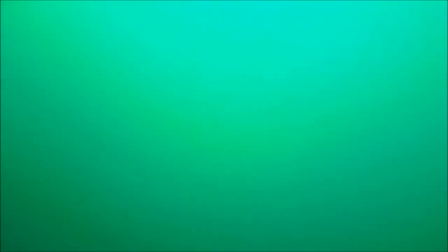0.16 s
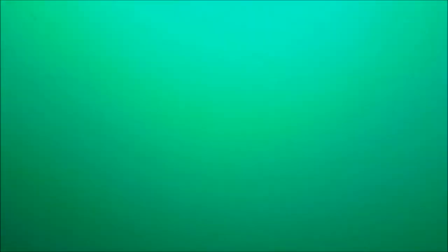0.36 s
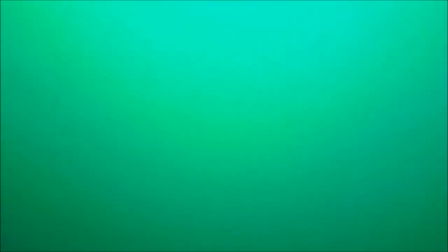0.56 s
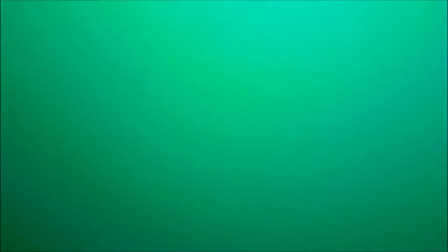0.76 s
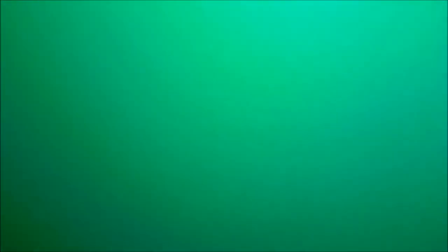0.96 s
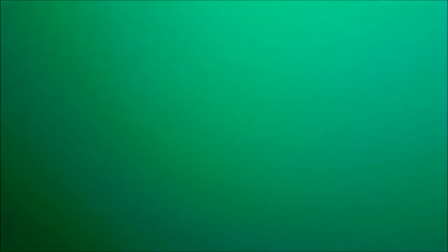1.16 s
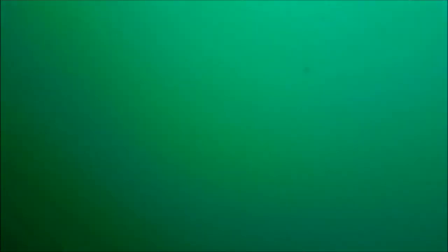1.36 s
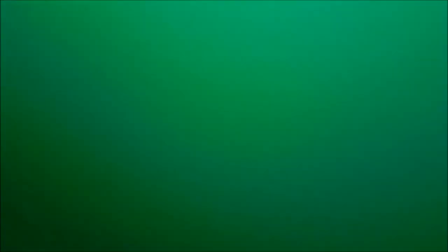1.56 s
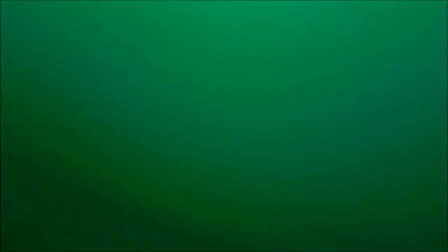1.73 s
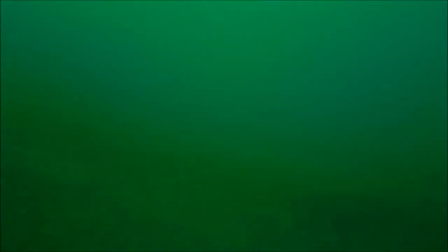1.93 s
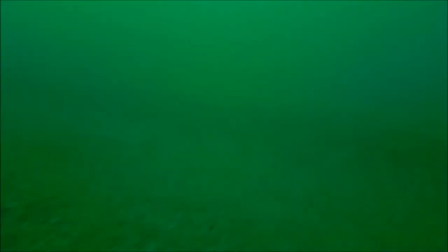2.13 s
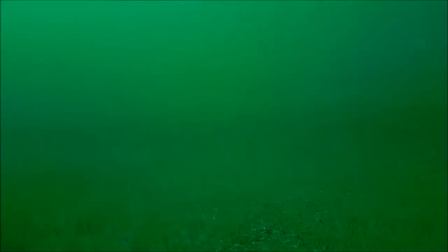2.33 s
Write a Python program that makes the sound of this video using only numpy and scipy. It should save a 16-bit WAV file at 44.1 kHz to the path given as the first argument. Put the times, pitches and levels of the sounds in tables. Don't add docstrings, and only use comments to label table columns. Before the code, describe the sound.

A distant boat engine throbs unevenly underwater over a soft hush of water, then fades; close scrapes, ticks and short squeaks follow on the plastic housing around the microphone, ending with a hard, distorted knock.

```python
import sys
import numpy as np
from scipy import signal
from scipy.fft import rfft, irfft
from scipy.io import wavfile

SR = 44100
rng = np.random.default_rng(int(sys.argv[2]) if len(sys.argv) > 2 else 0)


def wav_out(sig):
    wavfile.write(sys.argv[1], SR, np.round(np.clip(np.atleast_2d(sig).T, -1, 1) * 32767).astype(np.int16))


def ratio(d):
    e = np.asarray(d, float) / 20
    return 10 ** e


N = 105531
T = np.arange(N) / SR

# frequency [Hz], width [Hz], level for the engine [dB], level for contacts [dB].
SHELL_MODES = [(414.5, 29, -23.5, -6), (524.3, 28.5, -5, -6), (794.6, 113.4, 1, -2), (936, 136.3, 1, 1),
               (1096.4, 167, -9, -3.5), (1488.5, 27, -6.5, 3), (1629, 101, -7, 1), (1863, 270, -29.5, -0.5),
               (1969, 468, -45, -6), (2632, 85, -8.5, 2.5), (3024, 660, -38.5, -16), (3860, 234, -19, -9.5),
               (4945, 310, -51.5, -23), (5576, 143, -48, -22.5)]
WINDOW_MODES = [(3617.6, 435, -24, -11.5), (5740, 83, -86, -29.5), (6500, 60, -47.5, -32),
                (7570, 330, -52, -41), (8400, 690, -50.5, -27)]
# time [s], firing rate [Hz], level of the firing note [dB].
ENGINE_SPEED = [(0, 184.9, -61), (0.044, 186, -52), (.09, 169.9, -60.5), (0.299, 166.4, -60),
                (0.539, 169.2, -59), (.7, 185.5, -57.5), (0.841, 197.6, -58), (1.041, 196.7, -55),
                (1.14, 189.6, -57.5), (1.167, 193.9, -74), (1.198, 197.1, -54), (1.3, 187.8, -71.5)]
# time [s], level [dB].
ENGINE_LOAD = [(0, -39), (.1, -39), (.38, -38), (.44, -35.5), (.62, -35), (.8, -33.5), (1.0, -33),
               (1.22, -34), (1.25, -45.5), (1.3, -56)]
# multiple of the firing rate, level [dB].
SHAKING_ORDERS = [(2, -15), (2.5, -18), (3, -27), (4, -24), (5, -32)]
# time [s], peak level [dB], depth of the lull before [dB].
STRONG_FIRINGS = [(0.029, -25, -4), (0.113, -39, 10), (0.144, -30.5, 2), (0.212, -34, 5), (0.245, -25, 15),
                  (0.312, -27, 1), (0.395, -24, -3), (0.419, -21, -1), (0.426, -20, -5), (0.492, -21, 2),
                  (0.541, -24.5, 1.5), (0.56, -23.5, 3), (0.584, -25.5, 0), (0.605, -25, -4.5),
                  (.617, -26, -6), (0.656, -25, 4.5), (0.689, -29.5, 9), (0.694, -26.5, -7),
                  (0.722, -26.5, 1), (0.736, -17, 0), (.755, -21, 2.5), (0.799, -22, 18.5),
                  (0.815, -25, 1.5), (0.84, -20.5, 6), (0.853, -19.5, -2), (0.8894, -20.5, 17),
                  (0.909, -22, 3), (.921, -21.5, 3.5), (.966, -27.5, -1.5), (1.025, -29, 1),
                  (1.098, -30.5, 3.5), (1.132, -24, 1), (1.19, -20, -5)]
# frequency [Hz], density [dB per Hz].
WATER_SPECTRUM = [(12, -52), (20, -0.5), (218, -9), (776, -13.5), (924, 1.5), (1380, -11), (3630, -12),
                  (7660, -24.5), (9960, -32), (16900, -120)]
# time [s], change of the hush [dB].
FLOW_LEVEL = [(0, 0.3), (.6, 1.2), (1.2, 0.4), (1.5, -2), (1.62, -1), (1.9, -1.5), (2.05, -3), (2.4, 2)]
# centre [s], frequency [Hz], level
# [dB], half length [s].
SLOSHES_AND_THUMPS = [(1.27, 27.98, -54, 0.043), (1.275, 500, -49.5, 0.026), (2, 526, -44, 0.013),
                      (1.432, 189, -42, 0.0021), (1.44, 30.3, -51, 0.034), (1.455, 203.4, -50, 0.0035),
                      (1.51, 70, -48, 0.012), (1.56, 27.13, -48, 0.051), (2.18, 59.3, -58.5, 0.043),
                      (2.25, 25.2, -52, 0.073), (2.289, 60.2, -29.5, 0.002), (2.35, 29.4, -46, 0.049),
                      (2.35, 158, -50.5, 0.021), (1.5, 130, -50.5, 0.0085), (2.32, 228, -48, 0.012),
                      (2.38, 201, -54.5, 0.013), (2.29, 150, -40, 0.0045)]
# multiple of the firing rate, level [dB], centre [s], half length [s].
SINGING_ORDERS = [(3, -49.5, 0.14, 0.11), (3, -49, 0.41, 0.081), (3, -47, .59, 0.079), (2.6, -49, .95, .08),
                  (4, -37, 1.013, .1), (2, -53.5, .96, 0.079), (2.7, -50, 0.73, .08), (4.2, -40, .76, 0.09)]
# time [s], level [dB], brightness [dB per octave].
RUB_FIRST = [(1.27, -54.5, 9.5), (1.294, -35.5, -0.5), (1.32, -34.5, 3), (1.35, -34, -0.5),
             (1.365, -25, 5), (1.384, -29, 2), (1.404, -18.5, 3.5), (1.414, -31, -12.5),
             (1.426, -34.5, 2.5),
             (1.435, -12.5, -5.5), (1.447, -29.5, 2), (1.454, -20.5, 10), (1.47, -21.5, 3.5),
              (1.49, -18.5, 4), (1.508, -24.5, 1), (1.52, -26, 0.5), (1.545, -33.5, 2), (1.601, -41.5, -1)]
# time [s], level [dB], brightness [dB per octave].
RUB_DRAG = [(1.62, -47.5, -2.5), (1.699, -35, 3), (1.759, -39.5, 1.5), (1.861, -50, 3.5), (1.93, -42.5, 3),
            (1.98, -30.5, 1), (2.062, -28, 4), (2.12, -24, 5), (2.17, -24, 6.5)]
# time [s], level [dB], brightness [dB per octave].
RUB_SHUFFLE = [(2.17, -27, 2), (2.21, -19, -3), (2.24, -31.5, 0.5), (2.28, -25.5, 0), (2.3, -24.5, 1),
               (2.329, -19, -3.5), (2.355, -35, -3.5), (2.4, -32.5, -5)]
# time [s], peak level [dB], brightness [dB per octave], contact time [s].
TICKS = [(1.293, -31, 1, .003), (1.3, -31, 1, .002), (1.3153, -26, 1, .003), (1.667, -30, 0, .002),
         (1.676, -28, 0, .002), (.424, -27, 1, .004), (1.934, -32, 1, .002), (1.962, -30, 0, .003),
         (2.005, -25, 1, .002), (2.119, -21, 3, .003), (2.22, -19, 0, .002), (1.360, -21, 5, .002),
         (1.394, -19, 1, .003), (1.402, -15, 0, .007), (1.4292, -2.5, 1.5, .0012), (1.4507, -6, 1.5, .0015),
         (1.500, -13, 2, .003), (1.507, -15, 0, .003), (1.565, -17, 0, .003), (1.572, -19, 0, .002),
         (1.639, -21, 0, .003), (1.686, -27, 0, .003), (1.695, -25, 0, .005), (1.804, -31, 0, .003),
         (1.988, -27, 2, .003), (2.066, -21, 3, .003), (2.076, -19, 2, .002), (2.095, -19, 0, .003),
         (2.190, -17, 1, .003), (2.202, -12, 1, .003), (2.211, -13, 0, .004), (2.229, -18, 3, .002),
         (2.316, -11, 1, .002), (2.327, -13, 1, .002), (2.333, -14, 4, .002)]
# time [s], peak level [dB], brightness [dB per octave], contact time [s].
HARD_KNOCK = [
    (2.2828, -8, 1, .003),
    (2.2845, 4.5, 2.5, .002),
    (2.288, 4, 2.5, .0025),
    (2.297, -14, -2, .005),
]
# centre [s], frequency [Hz], level [dB], half length [s].
SQUEAK_NOTES = [(1.369, 2647, -17.5, 0.002), (1.489, 2565, -24, 0.006), (2.02, 1984, -27, 0.0066),
                (2.192, 1600, -11, 0.0017), (1.532, 1815, -16.5, 0.0047), (2.122, 2620, -20.5, 0.0056),
                (2.183, 1510, -12, 0.0044), (2.302, 1639, -9, 0.0083), (2.32, 1588, -11, 0.0037),
                (2.33, 1610, -10, 0.0031), (2.346, 1580, -18, 0.003), (2.359, 1524, -25.5, 0.0049),
                (1.642, 1703, -24, 0.0035), (2.124, 3740, -26, 0.023), (2.373, 1550, -24.5, 0.0051)]


def rms_one(x):
    return x / np.sqrt(np.mean(x ** 2) + 1e-20)


def in_time(rows):
    s, *columns = np.transpose(rows)
    return [np.interp(T, s, c) for c in columns]


def drift(rate):
    r = np.exp(-2 * np.pi * rate / SR)
    wander = signal.lfilter([1], [1, -2 * r, r * r], rng.standard_normal(N + SR))
    return rms_one(wander[SR:])


def grains(per_s, spread):
    sizes = ratio(spread * np.minimum(rng.exponential(1, N), 5)) * rng.choice([-1, 1], N)
    return rms_one(sizes * (rng.random(N) < per_s / SR))


def blips(rows, waver):
    total = np.zeros(N)
    for s, hz, db, half in rows:
        swell = ratio(db) * np.exp(-((T - s) / half) ** 2)
        total += swell * np.cos(2 * np.pi * hz * (T - s) + waver)
    return total


def shell(drive, column):
    out, power = 0, 0
    for k, row in enumerate(sorted(SHELL_MODES + WINDOW_MODES)):
        hz, width, gain = row[0], row[1], ratio(row[column])
        r = np.exp(-np.pi * width / SR)
        poles = [1, -2 * r * np.cos(2 * np.pi * hz / SR), r * r]
        ring = signal.lfilter([1, 0, -1], poles, drive(hz, k) + 1e-18)
        out = out + (-1) ** k * gain * (1 - r * r) / 2 * ring
        power += gain ** 2 * np.pi * width / SR
    floor = signal.butter(4, 363, "high", fs=SR, output="sos")
    return signal.sosfilt(floor, out) / np.sqrt(power)


def engine():
    hz, note_db = in_time(ENGINE_SPEED + [(1.34, ENGINE_SPEED[-1][1], -74.5)])
    load_db, = in_time(ENGINE_LOAD + [(1.4, -94)])
    turns = np.cumsum(hz / SR)
    late = turns + 0.06 * drift(60)
    count = np.floor(np.maximum.accumulate(late))
    firing_db = 1.5 * rng.standard_normal(N) - 6 * (count % 2)
    fired = np.diff(count, prepend=0) * ratio(firing_db)
    crackle = grains(4000, 2.3) * (1 + 0.38 * np.cos(2 * np.pi * late))
    clean = np.zeros(N)
    for k, db in SHAKING_ORDERS:
        clean += ratio(db + 0.58 * drift(5.6)) * np.cos(2 * np.pi * k * turns)
    surge_db = 0.6 * drift(40)
    drive = (clean + rms_one(fired) + ratio(-1) * crackle) * ratio(load_db - 0.27 + surge_db)
    push, lull_db = strong_firings()
    drive = drive * ratio(lull_db) + push
    octave = ratio(-14) * ratio(1.4 * drift(6)) * np.sin(4 * np.pi * turns)
    note = np.sin(2 * np.pi * turns) + octave
    throb = shell(lambda hz, k: drive * ratio(1.45 * drift(21)), column=2)
    return throb + np.sqrt(2) * ratio(note_db + 1.5 * drift(50)) * note


def strong_firings():
    lull_s, tail_s, grit_share = 0.0074, 0.0052, 0.12
    push, lull, grit = np.zeros(N), np.zeros(N), rng.standard_normal(N)
    for s, db, lull_db in STRONG_FIRINGS:
        push[int(s * SR)] += ratio(db + 15.5)
        tail = (T > s) * np.exp(-np.maximum(T - s, 0) / tail_s)
        push += ratio(db + 9) * grit_share * grit * tail
        lull -= lull_db * (T < s) * np.exp(-((T - s) / lull_s) ** 2)
    return push, lull


def water():
    hz = np.fft.rfftfreq(N, 1 / SR) + 1
    f, db = np.transpose(WATER_SPECTRUM)
    colour = ratio(np.interp(np.log(hz), np.log(f), db))
    hush = rms_one(irfft(rfft(rng.standard_normal(N)) * colour, N))
    flow_db, = in_time(FLOW_LEVEL)
    hush_db = -52 + flow_db - 0.2 * drift(2.8)
    return ratio(hush_db) * hush + blips(SLOSHES_AND_THUMPS, drift(2.1))


def singing_orders():
    turns = np.cumsum(in_time(ENGINE_SPEED)[0] / SR)
    total = np.zeros(N)
    for k, db, s, half in SINGING_ORDERS:
        swell = ratio(db + 1.5 * drift(17)) * np.exp(-((T - s) / half) ** 2)
        total += swell * np.sin(2 * np.pi * k * turns)
    return total


def contacts():
    before = [(0, -100, 0.0036), (1.2, -81, 0.035)]
    rub_db, tilt = in_time(before + RUB_FIRST + RUB_DRAG + RUB_SHUFFLE[1:])
    patchy_db = 1.1
    rub = grains(7000, 1.5) * ratio(rub_db + patchy_db * drift(35))
    grit = rng.standard_normal(N)
    knocks = TICKS + HARD_KNOCK
    chance = rng.standard_normal((len(knocks), len(SHELL_MODES + WINDOW_MODES)))

    def drive(hz, k):
        octaves = np.log2(max(hz, 690) / 1600)
        out = rub * ratio(tilt * octaves + patchy_db * drift(9.6))
        top_db = -4 * max(octaves - 2, 0) * 2
        for (s, db, bright, length), luck in zip(knocks, chance):
            i = int(s * SR)
            count = min(N - i, int(6 * length * SR) + 9)
            u = np.arange(count) / SR / (length + 1e-4)
            burst = np.exp(-u) * grit[i:i + count] + 6 * (u == 0)
            strength = abs(burst @ np.exp(2j * np.pi * hz / SR * np.arange(count)))
            burst = burst * 10 / np.maximum(strength, 6)
            out[i:i + count] += ratio(db - 2 + bright * octaves + top_db + 1.5 * luck[k]) * burst
        return out
    return shell(drive, column=3)


def squeaks():
    return blips(SQUEAK_NOTES, drift(80))


def scene():
    return (engine() + water() + singing_orders() + contacts() + squeaks())[None, :]


def band_limit(x):
    return signal.sosfilt(signal.butter(12, 7810, fs=SR, output="sos"), x)


def record(dry):
    top_cut = signal.cheby2(14, 50, 8350, fs=SR, output="sos")
    x = signal.sosfilt(top_cut, dry) - 0.0017
    return band_limit(np.clip(x, -1, 1))


dry = scene()
out = record(dry)
wav_out(out)
```